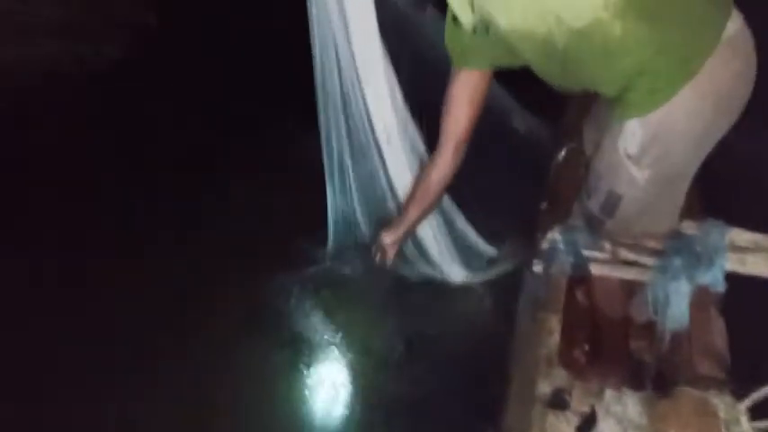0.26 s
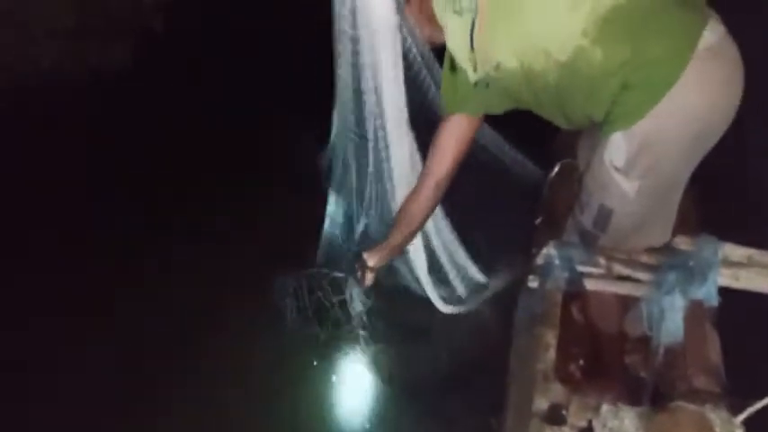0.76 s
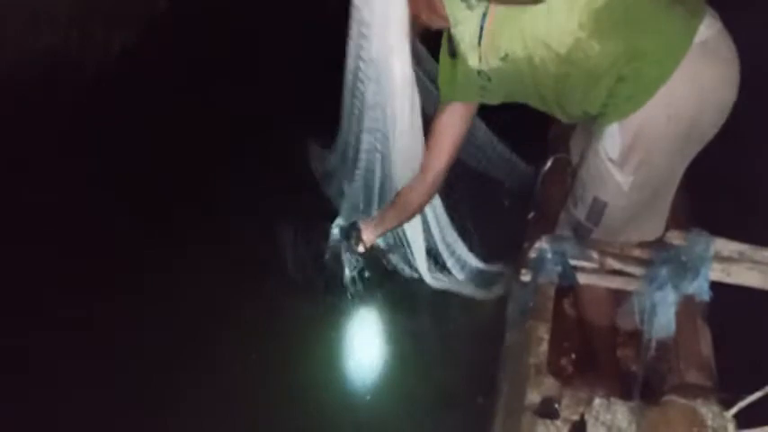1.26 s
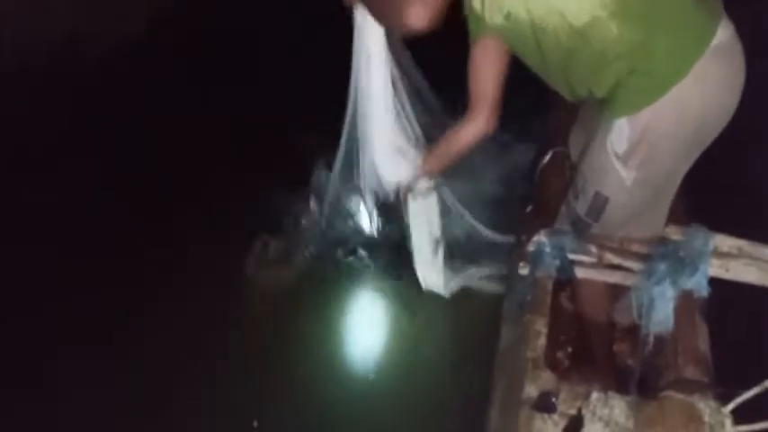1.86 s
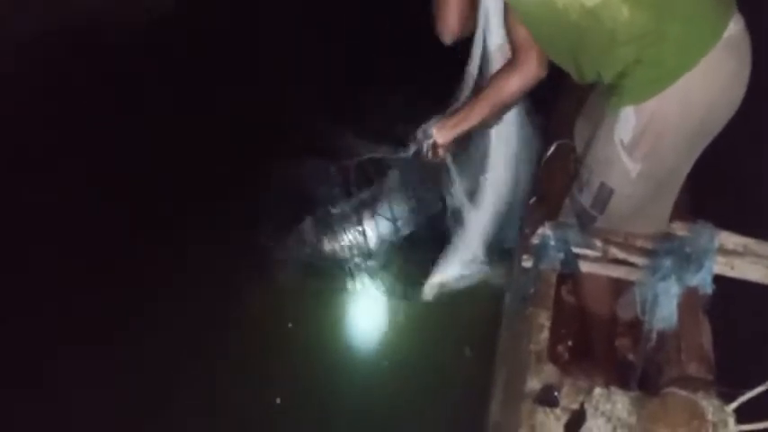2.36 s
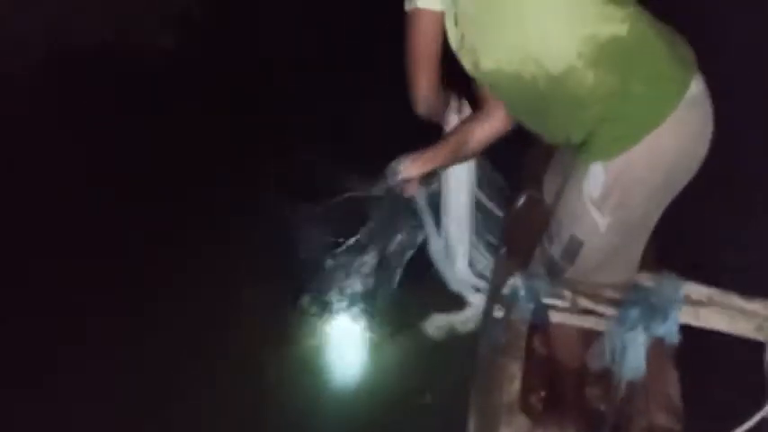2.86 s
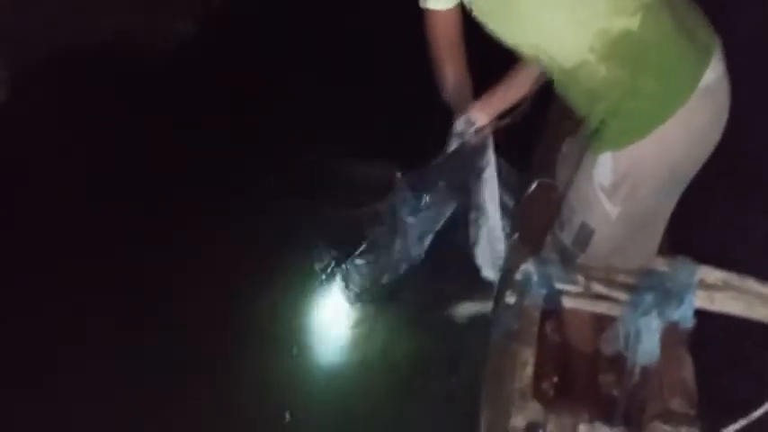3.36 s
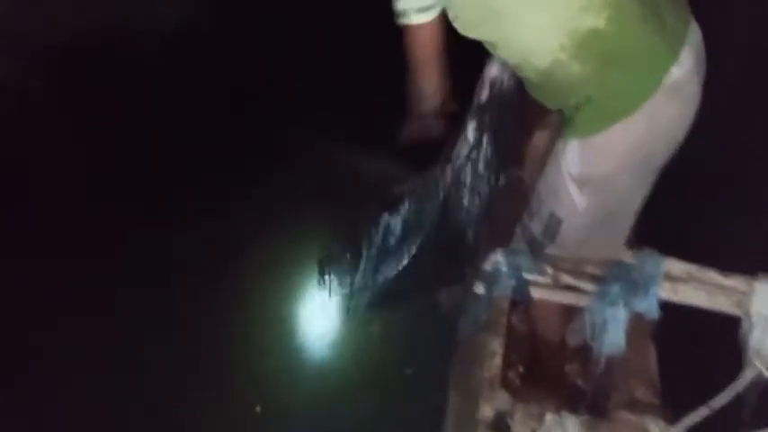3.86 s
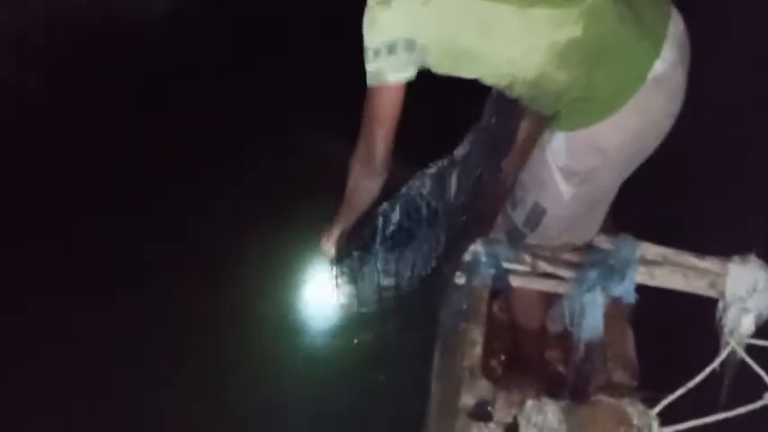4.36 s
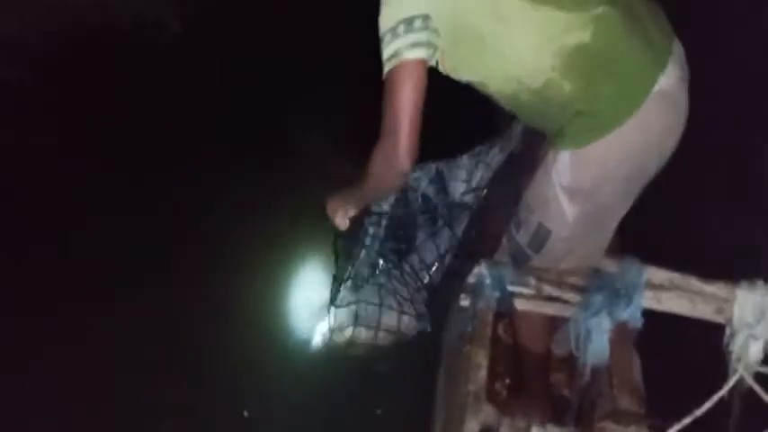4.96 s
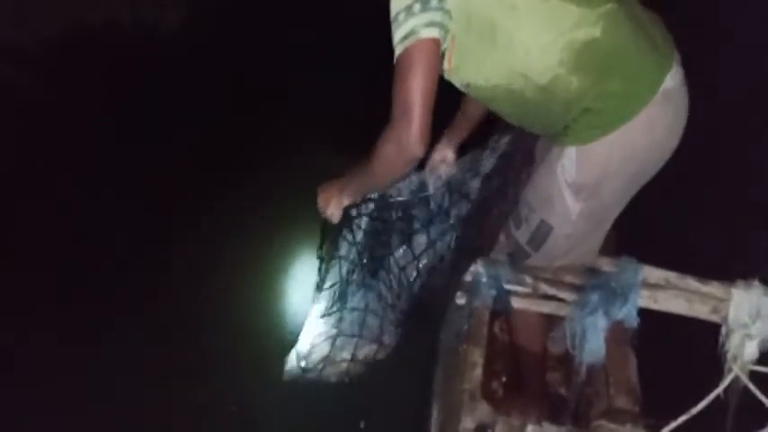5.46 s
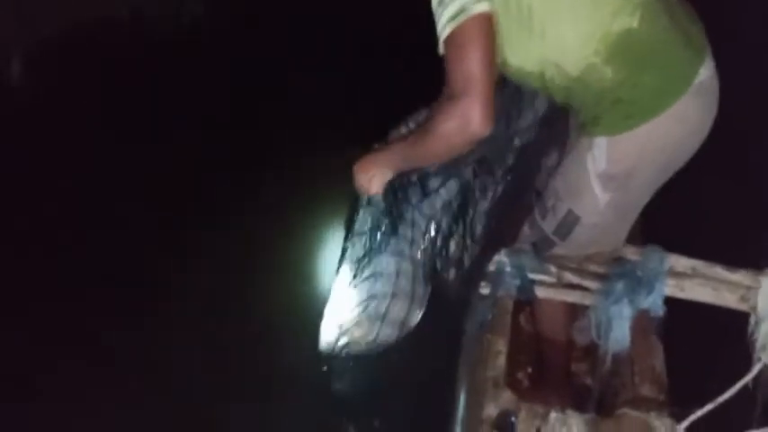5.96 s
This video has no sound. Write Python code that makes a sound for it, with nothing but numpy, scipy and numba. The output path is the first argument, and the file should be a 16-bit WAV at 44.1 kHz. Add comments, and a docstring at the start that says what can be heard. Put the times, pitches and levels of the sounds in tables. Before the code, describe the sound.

An open river at night, heard close in stereo. Throughout, a near frog, left of centre, gives rapid dry rattles of two to five clicks around 3.6 kHz, five or six a second, growing stronger; a very high insect buzz pulses over a soft, throbbing far chorus. From 0.3 s single drips plink and spit, with faint low rumbles. Between 0.75 and 1.5 s planks knock dully and rope creaks, left, while a short trickle crackles around 1.1 s. Quiet drips return at 2.1 s. At 2.55 s water bursts off the mesh in bright hissing spray, with deep glugs from 2.7 to 2.9 s, sharp spatters near 3 s, thinning by 3.6 s. Drops slap at 3.35 s. A hard wooden knock lands at 3.8 s, creaks follow to 4.3 s and faintly at 4.9 s. Faint far notes come at 5.15 and 5.8 s, then a tiny knock and creak near 6.05 s.

```python
"""Night on a river: a wet net is hauled up beside a wooden boat, over a far chorus of frogs and insects.
From the start a near frog rattles in short clicks and a shrill insect buzzes; both go on throughout.
First water trickles and drips off the mesh while planks knock and creak; at 2.5 s it pours out with deep glugs.
Then late drops slap the water, the boat knocks and creaks again, and two faint far notes come near the end.
Clicks, bubbles and wood are decaying sine grains; air, hiss, rumble and mesh slides are filtered noise."""
import sys
import numpy as np
from scipy import signal
from scipy.fft import rfft, irfft
from scipy.io import wavfile
from scipy.ndimage import uniform_filter1d
from numba import njit

SR = 44100
rng = np.random.default_rng(int(sys.argv[2]) if len(sys.argv) > 2 else 0)


def dump_mix(stems):
    """Bounce the given channels to the path in sys.argv[1] as a 16-bit WAV at rate SR."""
    frames = np.atleast_2d(stems).T  # one column per channel
    limited = np.clip(frames, -1, 1)  # hard clip at full scale
    pcm = np.round(limited * 32767).astype(np.int16)
    wavfile.write(sys.argv[1], SR, pcm)


N = 273420


def undb(db):
    """Decibels to amplitude."""
    return 10 ** (np.asarray(db) / 20)


def level(x, db):
    """Scale a sound to an rms level in dB."""
    return x * undb(db) / np.sqrt(np.mean(x ** 2))


def colour(x, points):
    """Filter by gains at (hz, db) points, joined on a log-frequency axis."""
    hz, db = np.transpose(points)
    f = np.maximum(np.arange(N // 2 + 1) * SR / N, 1)
    gain_db = np.interp(np.log(f), np.log(hz), db)
    return irfft(rfft(x) * undb(gain_db), N)


def band(x, lo_hz, hi_hz):
    """Band-pass with gentle slopes."""
    sos = signal.butter(2, [lo_hz, min(hi_hz, .45 * SR)], "band", fs=SR, output="sos")
    return signal.sosfilt(sos, x)


def walk(rate):
    """Random wander around zero: values held 1 / rate s, then slewed twice."""
    k = int(SR / rate)
    steps = np.repeat(rng.standard_normal(N // k + 1), k)
    return 2.5 * uniform_filter1d(uniform_filter1d(steps, k), k)[:N]


@njit
def ring(start, size, hz, t60, rise, glide, length):
    """Sine grains that swell over about rise s, die away and glide by a share of their pitch."""
    y = np.zeros(length)
    for g in range(len(start)):
        i0, n = int(start[g] * SR), int(t60[g] * SR) + 2
        fall, swell = np.exp(-np.log(1000) / n), np.exp(-1 / (rise[g] * SR))
        a, b, phase = 1., 1., 0.
        for i in range(min(n, length - i0)):
            y[i0 + i] += size[g] * a * (1 - b) ** 2 * np.sin(phase)
            a, b = a * fall, b * swell
            phase += 2 * np.pi * hz[g] * (1 + glide[g] * i / n) / SR
    return y


def grains(s, db, hz, t60, rise, glide=0.):
    """Sine grains starting at s seconds, whose envelope tops out at db."""
    columns = np.broadcast_arrays(s, db, hz, t60, rise, glide)
    s, db, hz, t60, rise, glide = (1. * np.ascontiguousarray(v) for v in columns)
    r = rise * np.log(1000) / t60
    top = (r / (2 + r)) ** r * (2 / (2 + r)) ** 2  # highest point of the unscaled envelope
    return ring(s, undb(db) / top, hz, t60, rise, glide, N)


def shower(per_s, lo_hz, hi_hz, cycles, spread_db, glide):
    """A random rain of grains, a few larger than the rest; rms 1."""
    when, tone, size = rng.random((int(per_s * N / SR), 3)).T
    hz = lo_hz * (hi_hz / lo_hz) ** tone
    db = -spread_db * np.log(1.01 - size)
    return level(grains(when * N / SR, db, hz, cycles / hz, 2.3 / hz, glide), 0)


def night():
    """Far frogs and insects blur into throbbing bands of clicks over still air, a coloured noise."""
    # spectrum of the air: pitch_hz, gain_db
    air_spectrum = [(120, -10), (200, -7.5), (700, -20), (2500, -17), (4700, -76.5), (5200, -35),
                    (7500, -6.5), (11000, -19), (15000, -25)]
    # far callers: centre_hz, width_hz, clicks_per_s, level_db
    callers = [(1633, 274, 320, -68), (3014, 170, 400, -59.5), (3622, 450, 1100, -49),
               (4056, 225, 700, -53), (5740, 740, 1100, -67), (6523, 500, 920, -60.5),
               (9130, 680, 830, -65)]
    air = level(colour(rng.standard_normal(N), air_spectrum), -60.5)
    out = air * undb(2.15 * walk(5.96))
    for hz, width, per_s, db in callers:
        calls = shower(per_s, hz - width / 2, hz + width / 2, 4.5 * hz / width, 1.8, 0.)
        throb_db = .7 * walk(3) + 1.4 * walk(30)
        out += undb(db + throb_db) * calls
    return out


def insect():
    """A shrill buzz of dense grains swells, flickers and fades until the next; a second insect zips now and then."""
    shrill_first_s, shrill_every_s, shrill_db = 0.12, .291, -61.0
    zip_first_s, zip_every_s, zip_db = 0.72, .82, -52.5
    time = np.arange(N) / SR
    t = time - np.arange(shrill_first_s, N / SR, shrill_every_s)[:, None]
    size = undb(rng.standard_normal((len(t), 1)))
    arch = np.clip(t / .03, 0, 1) * np.clip(1 - (t / .24) ** 2, 0, 1)
    swell = np.sum(size * arch, axis=0) * undb(1.5 * walk(25))
    t = time - np.arange(zip_first_s, N / SR, zip_every_s)[:, None]
    zip_swell = np.exp(-(t / 0.11) ** 2).sum(axis=0)
    zips = undb(zip_db) * zip_swell * shower(2000, 9200.0, 11500., 60., 1., 0.)
    return swell * undb(shrill_db) * shower(3900, 9900.0, 12400.0, 30., 1.4, 0.) + zips


def hoots():
    """Faint level notes from far off: single sines that swell and fade."""
    # notes: start_s, length_s, peak_db, pitch_hz
    notes = [(5.152, .045, -55, 740), (5.8, .35, -66, 255)]
    s, length, db, hz = np.transpose(notes)
    return grains(s, db, hz, 2 * length, length / 4)


def rumble():
    """Narrow low noise, partly unrelated left and right, that swells quickly and fades, over a faint floor."""
    # swells: start_s, level_db
    swells = [(.09, -58), (.37, -54.5), (.74, -48.5), (1.21, -54), (1.68, -60.5), (2.03, -56.5),
              (3.26, -57), (3.72, -55.5), (4.19, -53), (4.5, -58.5), (5.4, -58)]
    rise_s, fall_s, floor_db = 0.018, 0.21, -72
    s, db = np.transpose(swells)
    t = np.maximum(np.arange(N) / SR - s[:, None], 0)
    shape = (1 - np.exp(-t / rise_s)) ** 2 * np.exp(-(t / fall_s) ** 2)
    swell = undb(db) @ shape + undb(floor_db)
    common, own = rng.standard_normal(N), rng.standard_normal((2, N))
    noise = band(band(common + 0.24 * own, 57.4, 100.6), 52.0, 169.0)
    return swell * level(noise, 0)


def boat():
    """Dead wood: each blow or slip is a falling cycle or two with a duller after-thump; the rope also scrapes."""
    # blows on planks: start_s, level_db, pitch_hz (nominal: the fall starts above it)
    knocks = [(0.847, -41, 500), (0.911, -40.5, 163), (.968, -38, 430), (1.295, -36, 490),
              (1.318, -42.5, 710), (1.455, -38, 1640), (1.912, -44.5, 1290), (3.8, -29.5, 455),
              (3.819, -32.5, 1410), (3.871, -41, 282), (3.961, -44, 189), (4.294, -46, 1500),
              (6.045, -46, 1320)]
    # stick-slip of rope on wood: start_s, end_s, first_slips_per_s, last_slips_per_s, level_db, pitch_hz
    creaks = [(0.751, 0.829, 47, 60, -37.5, 480), (1.057, 1.246, 72, 80, -50, 500),
              (3.82, 3.867, 70, 72, -41, 333), (4.08, 4.208, 60, 85, -41, 435),
              (4.228, 4.284, 67, 80, -42.5, 460), (4.838, 4.954, 68, 90, -47, 192),
              (6.046, 6.174, 102, 100, -52, 188.6)]
    rows, scrape, t = list(knocks), 0, np.arange(N) / SR
    for t0, t1, first, last, db, hz in creaks:
        # a tightening rope slips evenly and ever faster; a slack one stutters
        uneven = .04 if last > 1.08 * first else .4
        s = t0
        for jitter, size, tone in rng.standard_normal((40, 3)):
            if s < t1:
                arch_db = -24 * ((s - t0) / (t1 - t0) - .5) ** 2  # strongest mid-pull
                slip_db = db + arch_db + (1.3 + 4 * uneven) * size
                rows.append((s, slip_db, hz * (1 + .12 * tone)))
                s += np.exp(uneven * jitter) / np.interp(s, (t0, t1), (first, last))
        scrape += undb(db) * np.exp(-((2 * t - t0 - t1) / (t1 - t0)) ** 2)
    s, db, hz = np.transpose(rows)
    blows = grains(s, db, 1.2 * hz, 4.16 / hz, 0.62 / hz, -0.6)
    thumps = grains(s + 0.00412, db - 10.0, 170 + 0.098 * hz, 0.015, 0.0012)
    return thumps - blows + scrape * level(shower(900, 131.0, 1900.0, 3.6, 3.3, 0.), -15.0)


def clicks():
    """Click times of the near frog: upbeats, a lead click, the main click and a hurrying run after it."""
    # rattles: main_click_s, clicks_after (count)
    rattles = [(.1, 1), (.276, 0), (.444, 0), (.605, 0), (.777, 1), (.945, 1), (1.115, 1), (1.294, 1),
               (1.455, 2), (1.641, 1), (1.798, 1), (1.968, 2), (2.14, 2), (2.306, 2), (2.477, 2),
               (2.813, 0), (3.018, 1), (3.2, 0), (3.376, 2), (3.573, 2), (3.763, 2), (3.957, 0), (4.009, 1),
               (4.189, 2), (4.349, 1), (4.418, 0), (4.576, 0), (4.629, 1), (4.813, 2), (5.006, 2),
               (5.196, 2), (5.389, 2), (5.58, 2), (5.772, 2), (5.958, 2), (6.148, 2)]
    # extra clicks that open a rattle: start_s
    upbeats = [1.251, 1.598, 3.31, 3.517, 3.707, 3.898, 4.13, 4.519, 4.755, 4.947, 5.138, 5.331, 5.524,
               5.718, 5.905, 6.094]
    lead_s, cold_lead_s, warm_up_s = .0305, .016, .86  # the lead is longer until the caller is warm
    after_s, hurry = .0218, 0.87  # gap after the main click; each further gap shrinks by this factor
    s = list(upbeats)
    for main, after in rattles:
        lead = lead_s + cold_lead_s * np.exp(-(main / warm_up_s) ** 8)
        s += [main - lead, main]
        s += list(main + after_s * np.cumsum(hurry ** np.arange(round(after))))
    return np.sort(s)


def frog():
    """Each click knocks the vocal sac, two damped resonances; the caller grows louder as it warms up."""
    # resonances of the sac: pitch_hz, level_db, t60_s
    sac = [(3603, -29, 0.0079), (3924, -34.5, 0.0046)]
    stutter_s, stutter_db = 0.0042, -6
    s = clicks()
    gap = np.diff(s, prepend=0)
    opens = gap > .06
    pitch_c, tone_c, size_c = rng.standard_normal((len(s), 3)).T
    # opening and hurried clicks are weaker, the second of a rattle is stronger
    db = .8 * size_c - 2.5 * opens - 3.5 * (gap < .021) + 1.5 * np.roll(opens, 1)
    db = db - 3 * np.exp(-s / .6)
    # the last click of a rattle is doubled
    last = np.diff(s, append=s[-1] + 1) > .06
    s, db = np.r_[s, s[last] + stutter_s], np.r_[db, db[last] + stutter_db]
    pitch_c, tone_c = np.r_[pitch_c, pitch_c[last]], np.r_[tone_c, tone_c[last]]
    out = 0
    for k, (hz, mode_db, t60) in enumerate(sac):
        click_db = db + mode_db + k * 3.3 * tone_c  # only the upper resonance varies in balance
        out += grains(s, click_db, hz * (1 + 0.0041 * pitch_c), t60, 0.0033)
    return out


def pour():
    """Flow off the mesh: spray is crackle over hiss, bubbles chirp upward, air glugs; returns treble and low part."""
    # a trickle, then the main pour; each a curve of time_s, spray_db
    flows = [
        [(.25, -98), (.55, -64), (.88, -52.5), (.96, -45.5), (1.06, -44), (1.17, -50.5), (1.22, -70),
         (1.47, -62.5), (1.55, -62)],
        [(2.545, -72), (2.565, -26.5), (2.67, -32), (2.895, -31), (2.91, -35), (2.93, -29), (3.0, -31.5),
         (3.07, -30), (3.25, -37.5), (3.32, -42.5), (3.35, -36), (3.46, -47.5), (3.57, -48.5), (3.7, -71)],
    ]
    # spectrum of the spray: pitch_hz, gain_db
    spray_spectrum = [(820, -7), (1400, -10.5), (3260, -0.5), (5010, -5.5), (6460, 2), (8250, -11.5),
                      (10200, -5.5), (13500, -19.5), (15500, -13)]
    plop_db, bubble_db, glug_db, glug_lag_s = -6.5, -8.5, -12.5, 0.052  # base levels against the spray
    gush_s, gush_end_s, gush_bubble_db, gush_glug_db = 2.67, 2.9, 4.5, 12.5
    thin_db, thin_slope = -44, 0.65  # below this spray level bubbles and glugs sink further, dB per dB
    crackle = level(colour(shower(1000, 1300., 15000., 13., 3.5, .1), spray_spectrum), 0)
    # the hiss is spread wide, half unrelated left and right
    hiss = rng.standard_normal(N) + rng.standard_normal((2, N))
    hiss = level(colour(hiss, spray_spectrum), 0)
    bubbles = shower(600, 740., 1500., 11., 2.4, .15)
    plops = shower(250, 800., 3200., 22., 2.8, .3)
    glugs = shower(350, 205.0, 460.0, 8.0, 2.3, 0.216)
    high, low, t = 0, 0, np.arange(N) / SR
    # air escapes from under the net
    gush = np.clip((t - gush_s) / 0.013, 0, 1) * np.clip((gush_end_s - t) / 0.037, 0, 1)
    lag = int(glug_lag_s * SR)
    for rows in flows:
        s, db = np.transpose(rows)
        spray_db = np.interp(t, s, db, -120, -120)
        # glugs lag behind a rising flow
        late_db = np.minimum(np.roll(uniform_filter1d(spray_db, lag), lag // 2) - spray_db, 0)
        sink_db = thin_slope * np.minimum(spray_db - thin_db, 0)
        flow = undb(spray_db + 1.05 * walk(55))
        # a trickle mostly crackles; a heavy pour blurs into hiss
        dense = np.clip((spray_db + 52) / 30, .02, .62)
        spray = np.sqrt(1 - dense) * crackle + np.sqrt(dense) * hiss
        body = undb(plop_db) * (1 - dense) ** 2 * plops
        body += undb(bubble_db + sink_db + gush_bubble_db * gush) * bubbles
        body += undb(glug_db + sink_db + late_db + gush_glug_db * gush) * glugs
        high, low = high + flow * spray, low + flow * body
    return high, low


def drips():
    """Single bubbles ring and chirp upward as they die away, each trailed by smaller ones of neighbouring pitch."""
    # dripping bubbles: start_s, peak_db, pitch_hz
    drops = [(.271, -48, 960), (.283, -47, 815), (.395, -45, 916), (.615, -52.5, 930), (.944, -39.5, 1930),
             (.984, -34.5, 1077), (1.029, -26, 1680), (1.043, -27, 1856), (1.068, -34, 2580),
             (1.158, -38, 993), (2.132, -44.5, 902), (2.179, -55, 1030), (2.28, -54.5, 987),
             (2.343, -48.5, 890), (2.402, -52, 915), (2.559, -22, 1150), (2.586, -21, 1070),
             (2.681, -23.5, 915), (2.085, -56, 1040), (.585, -46, 1710), (1.052, -44, 898),
             (2.611, -27.5, 960)]
    # deep bubbles of trapped air: start_s, peak_db, pitch_hz
    deep_bubbles = [(2.692, -15, 241), (2.726, -25, 225), (2.796, -25, 289), (2.877, -21, 311),
                    (3.336, -32.5, 240)]
    # late drops hitting the water flat: start_s, peak_db, pitch_hz
    slaps = [(3.247, -45, 715), (3.343, -22, 1585), (3.393, -33, 1880), (3.511, -34.5, 1850),
             (3.555, -40, 2000)]
    out = 0
    for table, cycles in (drops, 34.), (deep_bubbles, 12.), (slaps, 11.):
        s, db, hz = np.transpose(table)
        out += grains(s, db, hz, cycles / hz, 0.041 * cycles / hz, 0.286)
        for late, tone in rng.random((2, 2, len(s))):
            out += grains(s + 25 * late / hz, db - 7, hz * (.8 + .4 * tone), cycles / hz, 1 / hz, .3)
    return out


def spats():
    """Bursting drops: three very short high resonances struck together."""
    # bursts: start_s, level_db
    bursts = [(0.286, -39), (0.389, -33), (.412, -38), (.454, -42), (0.501, -35.5), (0.524, -37),
              (0.643, -36), (.9052, -41), (.9481, -40), (.963, -40), (0.976, -34), (1.026, -27.5),
              (1.067, -19.5), (1.075, -37), (1.092, -44), (1.123, -34), (1.133, -37), (1.1699, -21.5),
              (1.1728, -27), (1.185, -33), (1.458, -35), (2.974, -16), (3.074, -17), (3.1791, -20),
              (3.3007, -21.5), (6.0005, -42)]
    s, db = np.transpose(bursts)
    out = 0
    for hz, tilt_db, t60 in (4200, -6, .003), (6200, 0, .005), (10000, -8, .002):
        size, tone = rng.standard_normal((2, len(s)))
        out += grains(s, db + tilt_db + 2 * size, hz * np.exp(0.079 * tone), t60, 0.00013)
    return out


def swishes():
    """Wet mesh slides: narrow treble noise under a bell-shaped swell; the last one is a chirp of the second
    insect, made the same way."""
    # slides, the last an insect chirp: centre_s, half_length_s, pitch_hz, level_db
    slides = [(0.781, 0.028, 6800, -43.5), (2.473, 0.061, 6600, -51.5), (3.919, 0.031, 7900, -43)]
    out, t = 0, np.arange(N) / SR
    for s, half, hz, db in slides:
        noise = level(band(rng.standard_normal(N), 0.85 * hz, 1.156 * hz), db)
        out += np.exp(-((t - s) / half) ** 2) * noise
    return out


def water():
    """All water and wet mesh: treble of spray, spats and slides; low part of bubbles and glugs."""
    high, low = pour()
    return high + spats() + swishes(), low + drips()


def ports(x, left_db):
    """One source in both channels, left_db louder on the left."""
    return x * undb([[left_db / 2], [-left_db / 2]])


def scatter(x):
    """Banks and water surface scatter sound differently to each side: short decaying noise echoes."""
    t = np.arange(SR // 4) / SR
    decay = np.exp(-np.log(1000) * t / 0.061) * (t > .003)
    tails = band(rng.standard_normal((2, len(t))) * decay, 362.0, 13000.0)
    tails /= np.sqrt(np.sum(tails ** 2, axis=1, keepdims=True))
    return signal.fftconvolve(x, tails, axes=1)[:, :N]


def scene():
    """Place every source between left and right."""
    water_lag_s, lag_top_hz = .0009, 620  # the water's sound below lag_top_hz comes later on the left
    high, low = water()
    near, far = frog() + high, night()
    wet = scatter(undb(-8) * near - .25 * high + undb(-6) * low)
    # part of the far chorus comes from all round, unrelated left and right
    around = 0.79 * far + 0.58 * np.array([np.roll(far, N // 3), np.roll(far, -N // 3)])
    deep = signal.sosfiltfilt(signal.butter(4, lag_top_hz, fs=SR, output="sos"), low)
    lagged = np.array([low - deep + np.roll(deep, int(water_lag_s * SR)), low])
    out = ports(near + wet + around + hoots(), 6.6) + ports(lagged, 1.7)
    return out + ports(boat(), 14.2) + ports(rumble(), 1.7) + insect()


def record(dry):
    """Above about 9 kHz both channels hear the same; the top is cut steeply."""
    side_top_hz, top_hz = 9300, 15900
    mid, side = (dry[0] + dry[1]) / 2, (dry[0] - dry[1]) / 2
    side = signal.sosfiltfilt(signal.butter(6, side_top_hz, fs=SR, output="sos"), side)
    cut = signal.ellip(10, .2, 80, top_hz, fs=SR, output="sos")
    return signal.sosfilt(cut, np.array([mid + side, mid - side]))


dry = scene()
out = record(dry)
dump_mix(out)
```